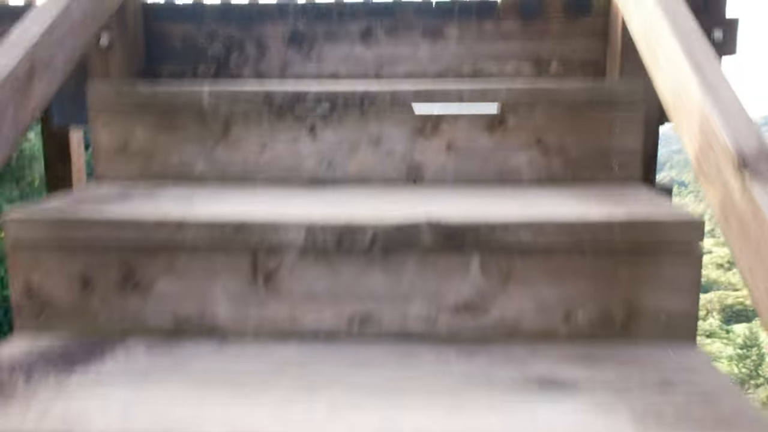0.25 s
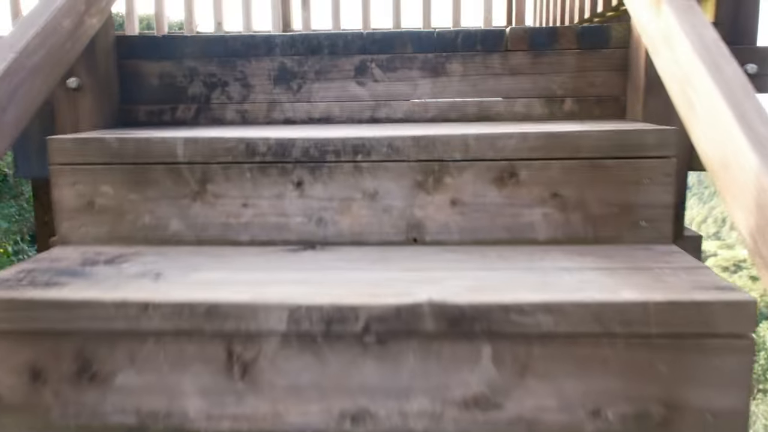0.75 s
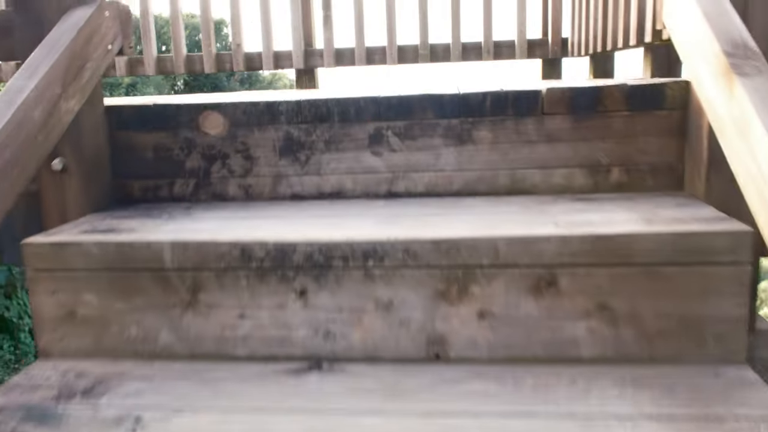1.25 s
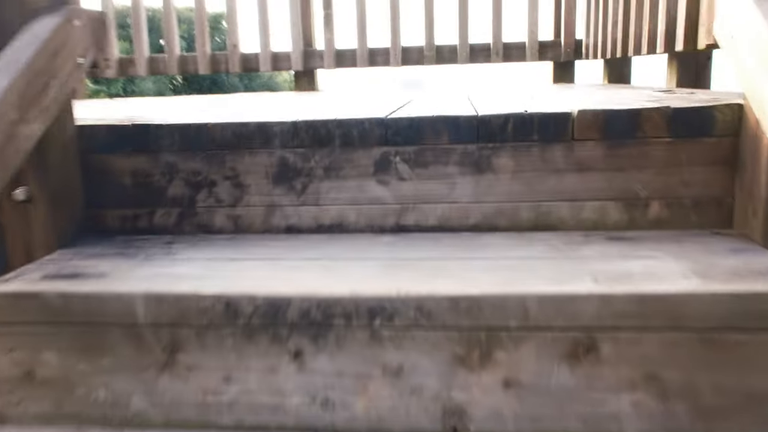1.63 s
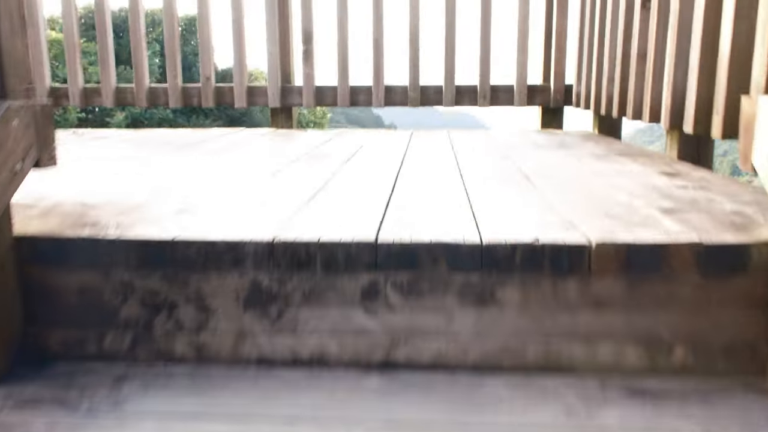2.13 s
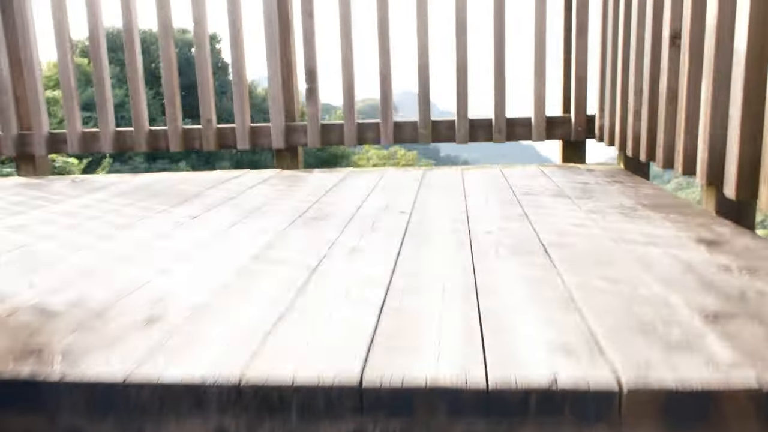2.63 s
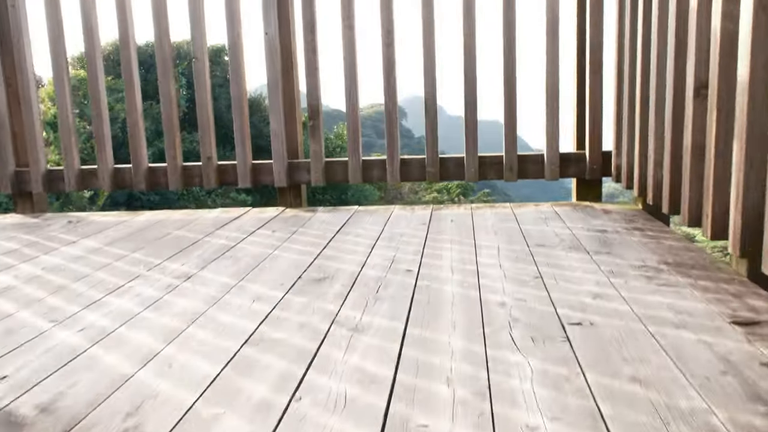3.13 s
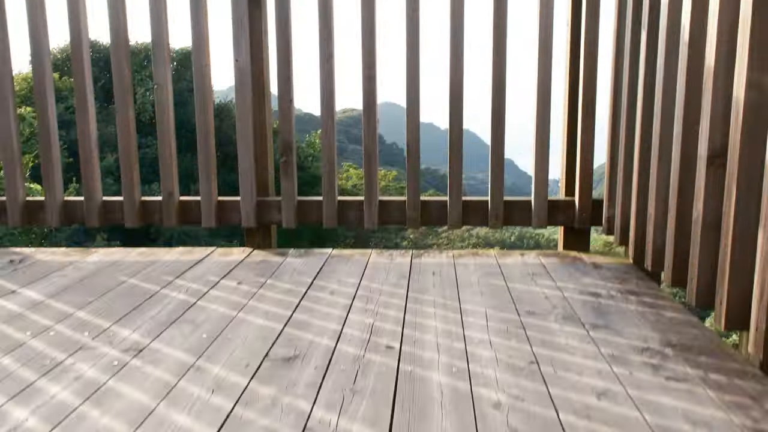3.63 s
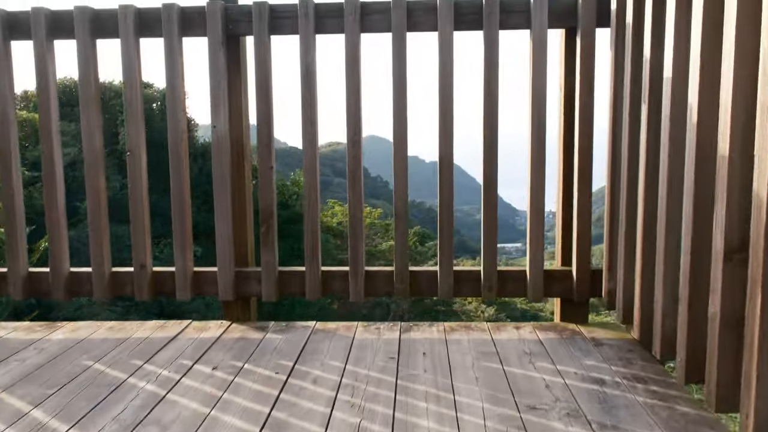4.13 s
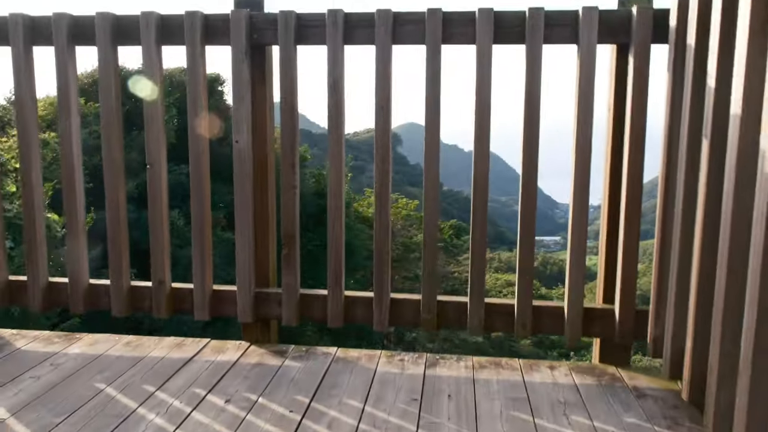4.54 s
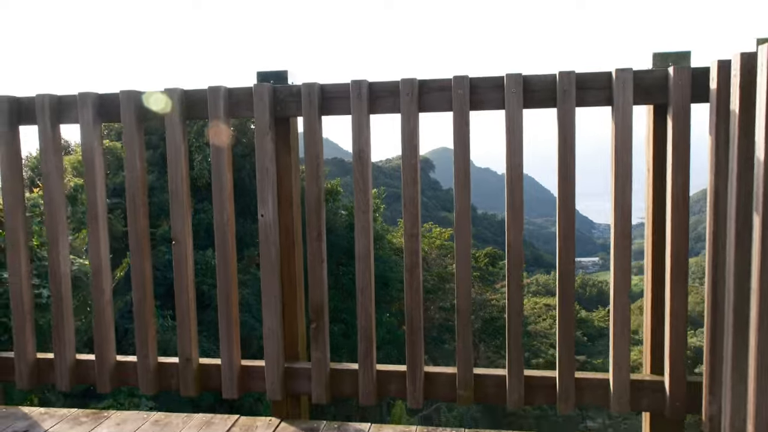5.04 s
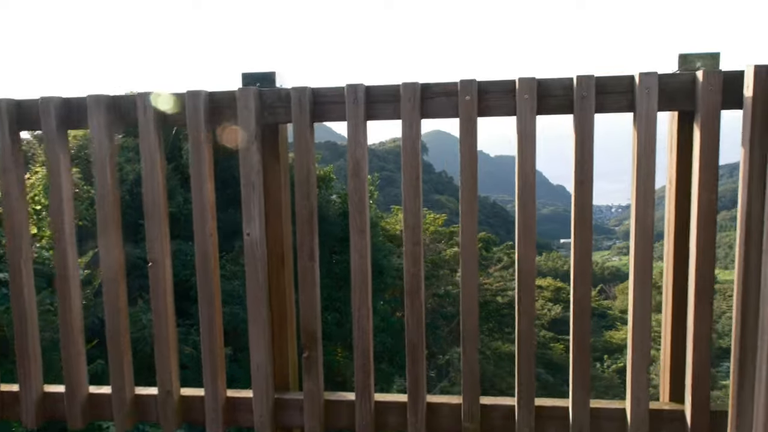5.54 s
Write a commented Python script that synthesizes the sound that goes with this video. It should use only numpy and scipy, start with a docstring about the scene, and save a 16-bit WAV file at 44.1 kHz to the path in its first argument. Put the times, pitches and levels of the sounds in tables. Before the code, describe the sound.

Slow footsteps climb wooden stairs and cross a hollow plank deck outdoors, under a steady, dense hiss of cicadas, crickets and katydids.

```python
"""Footsteps on a plank deck among summer insects

Someone climbs wooden stairs and crosses a plank deck outdoors, carrying a mono microphone.
Each sole's blows ring plank modes, the joists boom as slow damped sines, and the tower sways
below hearing pitch. Cicadas, crickets and katydids are bands of shaped noise, with bending notes,
pulsed hiss and a comb of overtones for the nearer singers."""
import sys
import numpy as np
from scipy import signal
from scipy.fft import rfft, irfft, next_fast_len
from scipy.io import wavfile
from scipy.ndimage import uniform_filter1d, map_coordinates

SR = 44100
rng = np.random.default_rng(int(sys.argv[2]) if len(sys.argv) > 2 else 0)


def attenuation_scalar(level_db):
    """Turn a level in dB into a linear amplitude multiplier (20 dB per decade)."""
    decades = np.asarray(level_db, float) / 20
    return 10 ** decades


def waveform_to_disk(signal):
    """Save audio, clipped to [-1, 1], as 16-bit WAV at the path in sys.argv[1]."""
    frames = np.transpose(np.atleast_2d(signal))
    scaled = np.clip(frames, -1, 1) * 32767
    samples = np.round(scaled).astype(np.int16)
    wavfile.write(sys.argv[1], SR, samples)


N = 255335  # samples

# Sway of the tower. Each row: time in seconds, rms level in dB before the random waver.
SWAY = [(0.0, -24), (0.29, -48.5), (0.32, -32.5), (0.72, -29.5), (0.85, -15), (0.97, -35), (1.24, -33.5),
        (1.8, -24.5), (2.27, -38.5), (2.32, -30.5), (2.52, -20), (2.6, -40), (2.63, -29.5), (3.32, -29.5),
        (3.37, -22.5), (3.81, -42), (4.01, -26.5), (4.18, -34), (4.35, -22), (4.48, -32), (4.53, -24.5),
        (5.19, -34), (5.4, -23), (5.79, -34.5)]
SWAY_HZ, SWAY_DRIFT_HZ_PER_S, SWAY_WAVER_HZ, SWAY_WAVER_DB = 14.5, 0.65, 1.29, 3.5
RUMBLE_DB, HUSH_DB = -44.5, -53.5  # rms of the steady wind rumble and of the leaves
# The frame's shudder: rise in seconds, rms in dB for a 0 dB load, change in dB per dB of load.
SHUDDER_RISE_S, SHUDDER_DB, SHUDDER_FOLLOWS = 0.07, -36.5, 0.16

# Noise spectra, relative. Each row: frequency in Hz, density in dB per Hz.
RUMBLE_SPECTRUM = [(6, -32), (12, -8), (25, 4.5), (35, 2.5), (60, -3), (110, -6), (150, -21.5), (220, -60)]
HUSH_SPECTRUM = [(100, -50), (160, 1), (400, 1.5), (800, -1), (1200, 0.5), (1600, -56)]
LOW_CICADA_SPECTRUM = [(900, -55), (1250, -12), (1500, 0), (1700, 1.5), (2100, -1.5), (3000, -1),
                       (4000, -4.5), (4600, -11)]
MAIN_CICADA_SPECTRUM = [(3600, -12), (4200, -5), (4800, 1), (5400, 2.5), (6000, 0.5), (6600, -4),
                        (7500, -8), (8200, -30)]
CRICKET_SPECTRUM = [(7000, -44), (7800, 2.5), (8500, 1.5), (9000, 8), (9500, 1.5), (10500, -5),
                    (11500, -38)]
KATYDID_SPECTRUM = [(9500, -15.5), (10800, -7.5), (12500, -5.5), (14200, 0), (15300, -4.5), (16000, -5),
                    (17000, -60)]

# Insect chorus before its random swelling.
# Each row: time in seconds, low cicadas in dB, main cicadas in dB, crickets in dB.
CHORUS = [(0.0, -39, -34.5, -43.5), (0.29, -36.5, -35, -43.5), (0.37, -38, -36.5, -43),
          (0.66, -36.5, -34.5, -44), (0.72, -34.5, -34.5, -43), (0.89, -41.5, -36, -44),
          (1.27, -37, -35, -43.5), (4.0, -39, -35, -46), (5.79, -38, -35.5, -46.5)]
# Depth of random swelling. One row: low cicadas, main cicadas, crickets, far katydids, all in dB.
FLUTTER_DB = 1.3, 0.4, 0.55, 1
FAR_KATYDIDS_DB = -40

# Short notes inside the chorus. Each row: middle frequency in Hz, spread in octaves, number of notes,
# length in seconds, upward bend in octaves, middle peak level in dB.
CROWD = [(1650, .08, 60, .14, .04, -49), (2150, .3, 110, .16, .35, -51), (5400, .12, 220, .14, .008, -47),
         (9000, .04, 60, .1, .004, -58), (13800, .1, 250, .08, .003, -53)]

# The body's weight on the joists. Each row: start in seconds, level in dB, loudest region in Hz,
# its spread in octaves, tuning of that span as a factor.
LOADS = [(.05, -41.5, 126, 0.22, 1.08), (.72, -20, 130, 0.33, 1.02), (.81, -30.5, 123, 0.14, 1.04),
         (1.548, -32, 110, 0.56, 1), (2.187, -40, 110, .3, 1.05), (2.362, -31, 110, .33, 1.0),
         (3.253, -28, 72, 0.88, 1.03), (4.216, -37.5, 100, 0.53, 1.02), (5.222, -23, 109.3, 0.34, 0.98)]
# Joist modes. Each row: frequency in Hz before tuning, relative level in dB, rise in seconds.
JOIST_MODES = [(64.4, 2.5, 0.023), (98, -1.5, 0.028), (123, 0.5, 0.031), (140.3, -6.5, .04),
               (181.5, -6, .016)]

# Single whines of nearer singers. Each row: start in seconds, length in seconds, first frequency in Hz,
# last frequency in Hz, gain in dB.
GLIDES = [(.1, 0.18, 1600, 1800, -42), (.29, 0.055, 1800, 3300, -49), (.24, 0.13, 3220, 3680, -46),
          (.48, 0.12, 2100, 3020, -46), (.58, 0.19, 1550, 2000, -41), (1.05, 0.18, 1500, 2200, -45),
          (1.32, 0.1, 3950, 3960, -47.5), (1.47, .11, 2100, 2920, -42), (1.58, 0.073, 2100, 2760, -47),
          (2.02, 0.23, 1620, 2860, -41.5), (2.44, 0.045, 2620, 2600, -35.5),
          (2.58, 0.19, 1783, 2990, -41.5), (3.03, .08, 1900, 2400, -43), (3.42, .2, 1650, 2290, -45),
          (3.7, .16, 2050, 3200, -43.5), (3.57, .083, 12700, 12900, -44), (4.06, .097, 12800, 12800, -48),
          (4.1, .11, 2100, 2990, -43), (4.26, .13, 3720, 3450, -43), (4.68, .13, 10800, 10700, -47),
          (4.7, .15, 1900, 2340, -46.5), (5.45, 0.39, 1550, 1750, -45)]
# Breathy chirps above the main chorus. Each row: start in seconds, length in seconds,
# first frequency in Hz, last frequency in Hz, gain in dB.
CHIRPS = [(.25, .086, 6200, 6870, -39), (.77, 0.061, 5900, 6700, -34.5), (1.07, 0.073, 6400, 6900, -38),
          (1.54, 0.058, 6440, 7250, -41), (1.96, 0.06, 6100, 6900, -36), (2.64, .071, 6300, 7240, -42),
          (3.13, .12, 7000, 7950, -40), (4.2, .19, 7140, 7070, -38), (5.24, .12, 7000, 10200, -42)]
GLIDE_WIDTH_HZ, CHIRP_WIDTH_HZ = 155, 1200

# Sole contacts. Each row: start in seconds, level in dB, roll in seconds, loudest region in Hz,
# its spread in octaves.
STEPS = [(0.13, -35.5, 0.023, 664, 0.73), (0.718, -19, 0.012, 402, 1.4), (.731, -25, 0.011, 800, 1.4),
         (.748, -31, 0.02, 497, 0.44), (1.465, -45, 0.0095, 730, 0.36), (1.545, -26.5, 0.012, 352, 1.3),
         (1.556, -29, 0.0057, 1770, 0.34), (1.565, -29, 0.0091, 298, 0.79),
         (2.188, -41.5, 0.0079, 248, 0.82), (2.36, -27, 0.006, 1750, 0.85), (2.366, -22.5, .017, 780, 0.6),
         (2.41, -39, 0.0071, 400, 0.55), (2.53, -50.5, 0.008, 800, 1.2), (2.654, -45, 0.0087, 1060, 0.27),
         (3.248, -30, 0.0069, 342, 1.6), (3.26, -32, 0.012, 1580, 0.47), (3.27, -33, 0.023, 281, 1.2),
         (4.217, -40.5, 0.0039, 1310, 1.5), (4.221, -36, 0.01, 498, 1.9), (4.281, -37.5, 0.0056, 404, 0.73),
         (4.871, -49.5, 0.011, 201, 0.58), (5.214, -32, 0.014, 500, 1.9), (5.231, -28, 0.0038, 700, 1.8),
         (5.245, -40, 0.014, 237, 0.42), (5.382, -43, 0.011, 550, 1), (5.77, -53, 0.019, 399, 1.5)]
# Plank modes. Each row: frequency in Hz before detuning, relative level in dB, 60 dB decay in seconds.
PLANK_MODES = [(174, -4.5, 0.35), (228.5, 0.5, 0.2), (285, 3.5, 0.102), (343.6, -5.5, 0.18),
               (365.5, -5.5, 0.26), (415.5, -7.5, 0.18), (474, 0, 0.1), (532, -1.5, 0.12), (591, 2, 0.093),
               (642, 3, 0.042), (700, -6, 0.1), (723, -12, .09), (757, 1.5, 0.043), (834, -12, 0.18),
               (835, -29, 0.046), (934, 12.5, 0.026), (950, -26, 0.053), (1104, 1.5, 0.024),
               (1156, 10, 0.011), (1200, 5, 0.047), (1300, 0, 0.073), (1500, 8.5, 0.028), (1620, -19, .035),
               (1800, 2, 0.045), (1920, -25, .03), (2200, 2, 0.031), (2710, 12, 0.022), (3260, 1, 0.012),
               (4500, -18, .015)]
TICK_HZ, TICK_DB = 2800, -21.5  # the sole's hard edge, relative to the contact's loudest region

# Rasps of nearer katydids. Each row: start in seconds, length in seconds, level in dB.
RASPS = [(0.298, 0.11, -43), (.4, .29, -38.5), (.78, 0.26, -42), (1.25, 0.18, -45), (1.5, 0.28, -43.5),
         (1.98, .14, -42), (2.13, .3, -37.5), (2.62, 0.31, -45), (3.12, .06, -42), (3.24, 0.16, -37),
         (3.47, .03, -46), (3.567, 0.44, -42), (4.017, 0.38, -42), (4.66, .17, -37), (4.879, 0.24, -39),
         (5.143, .07, -37.5), (5.22, 0.22, -39.5), (5.7, .12, -41)]
RASP_EDGE_S = 0.03

# A ticking katydid. One row: frequency in Hz, width in Hz, start in seconds, end in seconds, gain in dB,
# pulses per second, time of one pulse's peak in seconds.
TICKER = (15350, 1200, 3.85, 4.66, -44, 14.4, 4.605)

# One near cicada before its pumping. Each row: time in seconds, drum-membrane clicks per second,
# level in dB.
BUZZ = [(3.9, 203, -75), (4.25, 204, -45), (4.4, 204.8, -40), (4.6, 205.7, -37), (5.0, 206.3, -38.5),
        (5.2, 208, -41.5), (5.46, 209, -37.5), (5.79, 208.8, -38.5)]
# Its overtones as the abdomen shifts. Each row: multiple of the click rate, early relative level in dB,
# late relative level in dB.
OVERTONES = [(20, -17, -10), (21, -14, -18), (22, -3, -3), (23, -15, -8), (24, 0, -2), (25, -7, -11),
             (26, -10, -6), (27, -11, -11), (28, -13, -8), (29, -13, -7), (31, -19, -11)]


def unit(x):
    """Normalisation: dividing a signal by its rms gives it unit power."""
    return x / np.sqrt(np.mean(np.abs(x) ** 2) + 1e-20)


def curves(rows):
    """Linear interpolation: each column after the time becomes one value per sample."""
    s, *columns = np.transpose(rows)
    return [np.interp(np.arange(N) / SR, s, column) for column in columns]


def wobble(rate, length=N):
    """Band-limited chance: a smooth curve through random knots, so many a second."""
    knots = rng.standard_normal(int(length * rate * 1.5 / SR) + 4)
    return map_coordinates(knots, [np.arange(length) * rate / SR])


def swell(start, rise):
    """Critically damped response: zero before the start, 1 after the rise time, then dying away."""
    u = np.maximum(np.arange(N) / SR - start, 0) / rise
    return u * np.exp(1 - u)


def hiss(spectrum, patchy_db):
    """Filtered noise: random patches of gain in time and frequency, then a spectrum, at rms 1."""
    z = signal.stft(rng.standard_normal(N + SR), nperseg=512)[2]
    field = rng.standard_normal(z.shape)
    field = uniform_filter1d(uniform_filter1d(field, 5, 0), 8, 1)
    x = signal.istft(z * attenuation_scalar(patchy_db * unit(field)), nperseg=512)[1]
    m = next_fast_len(len(x))
    f, level = np.transpose(spectrum)
    log_hz = np.log(np.fft.rfftfreq(m, 1 / SR) + 1)
    gain = attenuation_scalar(np.interp(log_hz, np.log(f), level, -120, -120))
    return unit(irfft(rfft(x, m) * gain, m)[:N])


def fuzzy_tone(hz, width_hz):
    """Random modulation of a carrier: the narrower the band, the stronger its steady core."""
    steady = 150 / width_hz
    slow = steady + wobble(width_hz, len(hz)) + 1j * wobble(width_hz, len(hz))
    return (slow * np.exp(2j * np.pi * np.cumsum(hz) / SR)).real


def air():
    """Low-frequency motion: the tower sways, each load shudders it, wind rumbles and far leaves hush."""
    sway_db, = curves(SWAY)
    sway_hz = SWAY_HZ + SWAY_DRIFT_HZ_PER_S * np.arange(N) / SR + SWAY_WAVER_HZ * wobble(6)
    sway_gain = attenuation_scalar(sway_db + SWAY_WAVER_DB * wobble(9)) * np.sqrt(2)  # rms to peak
    sway = sway_gain * np.sin(2 * np.pi * np.cumsum(sway_hz) / SR)
    shudders = [attenuation_scalar(SHUDDER_DB + SHUDDER_FOLLOWS * db) * swell(s, SHUDDER_RISE_S) for s, db, *_ in LOADS]
    shudder = np.max(shudders, axis=0)
    rumble = (attenuation_scalar(RUMBLE_DB) + shudder) * hiss(RUMBLE_SPECTRUM, patchy_db=1.5)
    hush = attenuation_scalar(HUSH_DB) * hiss(HUSH_SPECTRUM, patchy_db=0.5)
    return sway + rumble + hush


def chorus():
    """Incoherent summation: crowds of far insects blur into four bands of randomly swelling hiss."""
    low_db, main_db, cricket_db = curves(CHORUS)
    low, main, cricket, far = (attenuation_scalar(db * wobble(8)) for db in FLUTTER_DB)
    low_cicadas = attenuation_scalar(low_db) * low * hiss(LOW_CICADA_SPECTRUM, patchy_db=2.0)
    main_cicadas = attenuation_scalar(main_db) * main * hiss(MAIN_CICADA_SPECTRUM, patchy_db=0.97)
    crickets = attenuation_scalar(cricket_db) * cricket * hiss(CRICKET_SPECTRUM, patchy_db=0.36)
    far_katydids = attenuation_scalar(FAR_KATYDIDS_DB) * far * hiss(KATYDID_SPECTRUM, patchy_db=1.7)
    return low_cicadas + main_cicadas + crickets + far_katydids


def crowd():
    """Superposition: brief notes of middle-distance insects, scattered in time, pitch and loudness."""
    out = np.zeros(N + SR)
    for middle_hz, spread, notes, length, bend, db in CROWD:
        draw = rng.standard_normal((int(notes), 2))  # pitch, loudness
        start = rng.integers(0, N, int(notes))
        u = np.linspace(0, 1, round(length * SR))
        hz = middle_hz * 2 ** (spread * draw[:, :1] + bend * u ** 2)
        gain = attenuation_scalar(db + 2.0 * draw[:, 1:]) * np.sin(np.pi * u)
        note = gain * np.sin(2 * np.pi * np.cumsum(hz, axis=1) / SR)
        place = start[:, None] + np.arange(len(u))
        out += np.bincount(place.ravel(), note.ravel(), len(out))
    return out[:N]


def joists():
    """Forced beam modes: weight arrives after the contact, so low beams swell up and then die."""
    t = np.arange(N) / SR
    out = np.zeros(N)
    for s, db, centre_hz, spread, tuning in LOADS:
        for hz, level, rise in JOIST_MODES:
            reach_db = -10.2 * (np.log2(hz / centre_hz) / spread) ** 2
            boom = swell(s, rise) * np.sin(2 * np.pi * hz * tuning * (t - s))
            out += attenuation_scalar(db + level + reach_db) * boom
    return out


def whines(rows, width_hz):
    """Frequency glide: a nearer singer's fuzzy note moves ever faster from first to last pitch."""
    out = np.zeros(N + SR)
    for s, length, first_hz, last_hz, db in rows:
        u = np.linspace(0, 1, round(length * SR))
        note = fuzzy_tone(first_hz + (last_hz - first_hz) * u ** 1.9, width_hz)
        out[round(s * SR):][:len(u)] += attenuation_scalar(db) * np.sin(np.pi * u) ** 0.43 * note
    return out[:N]


def steps():
    """Modal excitation: the sole lands as a short train of tiny blows that ring the plank's modes."""
    out, t = np.zeros(N + SR), np.arange(SR // 5) / SR
    hz, level, t60 = np.transpose(PLANK_MODES)[:, :, None]
    for s, db, roll, centre_hz, spread in STEPS:
        # each contact finds every mode tuned a little differently
        tuned = hz * (1 + 0.038 * rng.normal(0, 1, hz.shape))
        blows = rng.standard_normal(SR // 20) ** 3 * np.exp(-(t[:SR // 20] / roll) ** 1.36)
        modes = attenuation_scalar(-60 * t / t60) * np.sin(2 * np.pi * tuned * t)
        ring = signal.fftconvolve(blows[None], modes, axes=1)[:, :len(t)]
        ring = ring / np.linalg.norm(ring, axis=1, keepdims=True)
        # the contact's hardness and place set how much energy each mode receives
        body = attenuation_scalar(-7.9 * (np.log2(hz / centre_hz) / spread) ** 2)
        tick = attenuation_scalar(TICK_DB - 13.0 * np.log2(hz / TICK_HZ) ** 2)
        share = attenuation_scalar(level) * (body + tick) * np.sqrt(t60)
        knock = np.sum(share * ring, axis=0) / np.linalg.norm(share)
        # the level is roughly the rms as if the energy filled 20 ms
        out[round(s * SR):][:len(t)] += attenuation_scalar(db) * knock * np.sqrt(SR / 50)
    return out[:N]


def rasps():
    """Gated noise: nearer katydids switch their hiss on, hold it and stop."""
    t = np.arange(N) / SR
    gain = np.zeros(N)
    for s, length, db in RASPS:
        inside = np.minimum(t - s, s + length - t)
        gain += attenuation_scalar(db) * np.clip(inside / RASP_EDGE_S + 0.5, 0, 1)
    return gain * hiss(KATYDID_SPECTRUM, patchy_db=2.1)


def ticker():
    """Amplitude modulation: a very high band of noise is pulsed into soft puffs."""
    hz, width_hz, start, end, db, rate, peak = TICKER
    t = np.arange(round(start * SR), round(end * SR)) / SR
    fade = np.clip(np.minimum(t - start, end - t) / 0.05, 0, 1)
    puffs = np.cos(np.pi * rate * (t - peak)) ** 4
    note = attenuation_scalar(db) * fade * puffs * fuzzy_tone(np.full(len(t), hz), width_hz)
    return np.pad(note, (round(start * SR), N - round(end * SR)))


def buzz():
    """Harmonic series: regular clicks amount to a comb of overtones; the abdomen pumps level and pitch."""
    first = round(BUZZ[0][0] * SR)
    t = np.arange(first, N) / SR
    pump = np.cos(2 * np.pi * 15.4 * (t - 4.6))  # 15.4 times a second
    rate, level_db = np.array(curves(BUZZ))[:, first:]
    turns = np.cumsum(rate * (1 - 0.0045 * pump + 0.001 * wobble(30, len(t)))) / SR
    late = np.clip((t - 4.95) / 0.27, 0, 1)
    comb = np.zeros(len(t))
    for k, early_db, late_db in OVERTONES:
        overtone_db = level_db + early_db + late * (late_db - early_db) + 2 * wobble(8, len(t))
        comb += attenuation_scalar(overtone_db) * np.sin(2 * np.pi * (k * turns + rng.random()))
    return np.pad((1 + 0.5 * pump) * comb, (first, 0))


def scene():
    """Sum and difference: one microphone feeds both channels, which differ only by a faint hush."""
    singers = whines(GLIDES, GLIDE_WIDTH_HZ) + whines(CHIRPS, CHIRP_WIDTH_HZ) + rasps() + ticker() + buzz()
    sound = air() + chorus() + crowd() + joists() + steps() + singers
    apart = attenuation_scalar(-69) * hiss(HUSH_SPECTRUM, patchy_db=3)
    return np.array([sound + apart, sound - apart])


def band_limit(x):
    """A steep low-pass at the top of the band."""
    return signal.sosfilt(signal.butter(12, 15710, fs=SR, output="sos"), x)


def record(dry):
    """Band limit: the finished mix is handed on through a steep low-pass near 15.7 kHz, where the treble ends."""
    return band_limit(dry)


dry = scene()
out = record(dry)
waveform_to_disk(out)
```